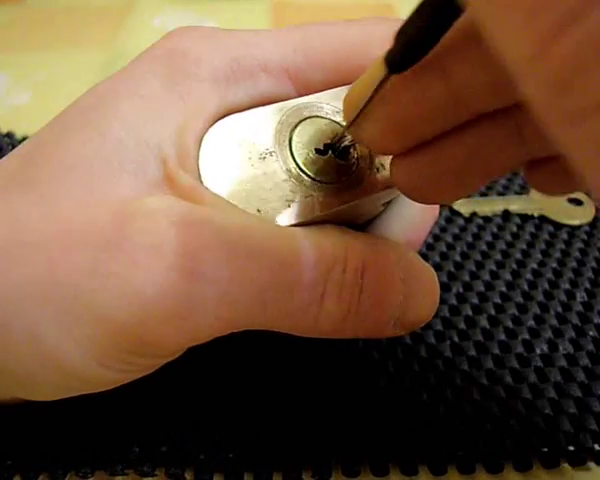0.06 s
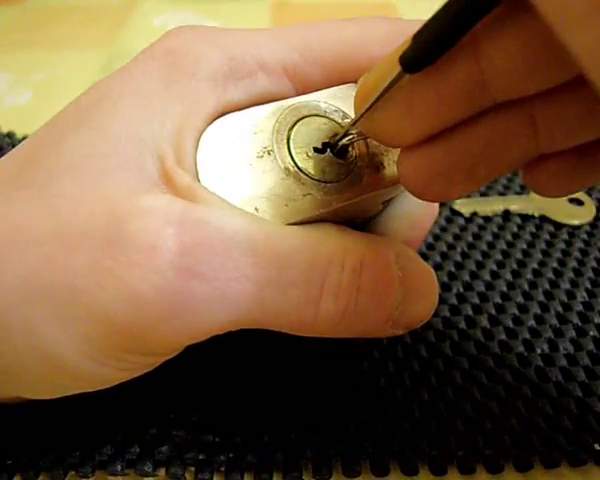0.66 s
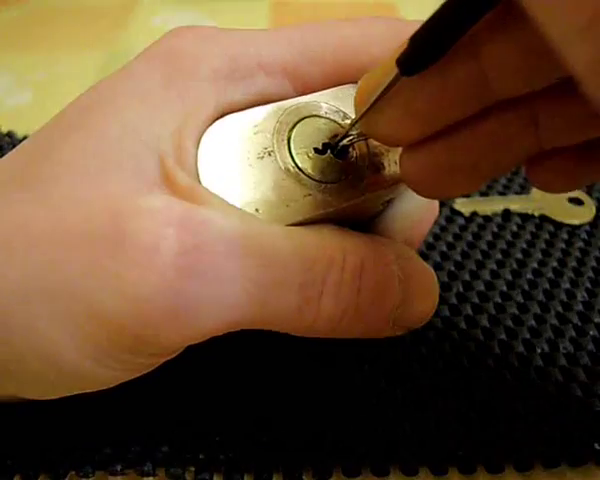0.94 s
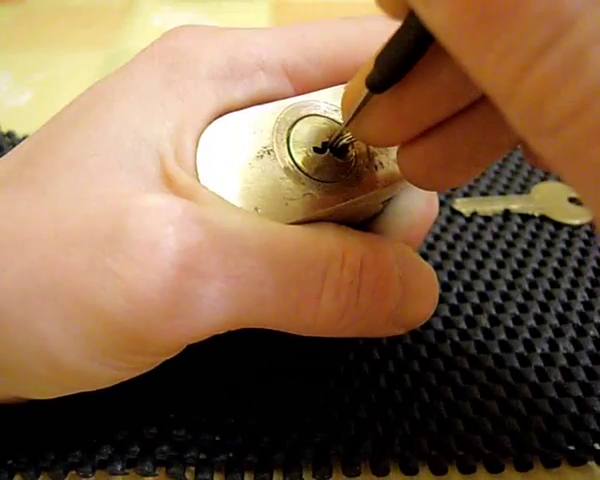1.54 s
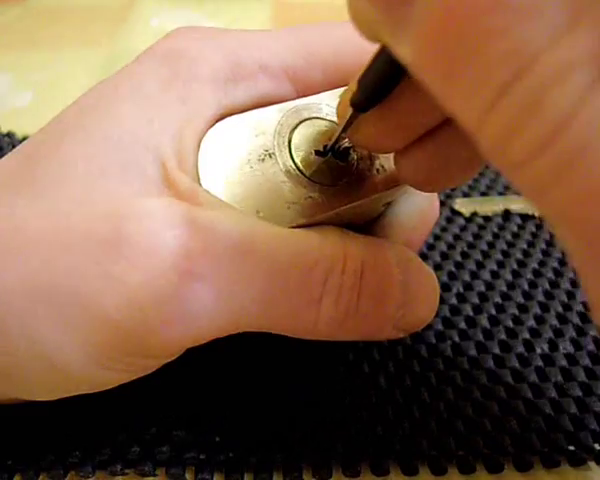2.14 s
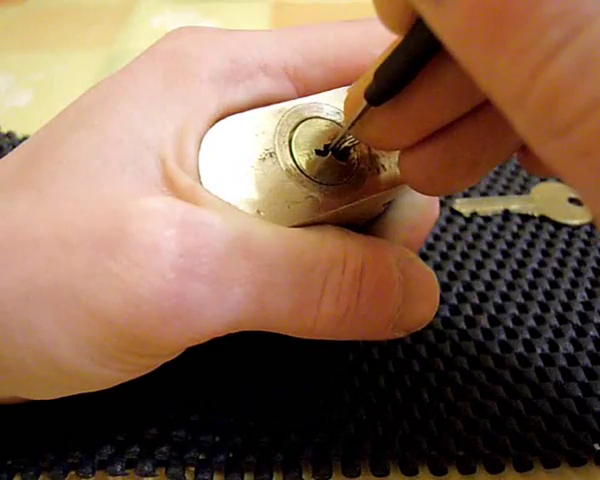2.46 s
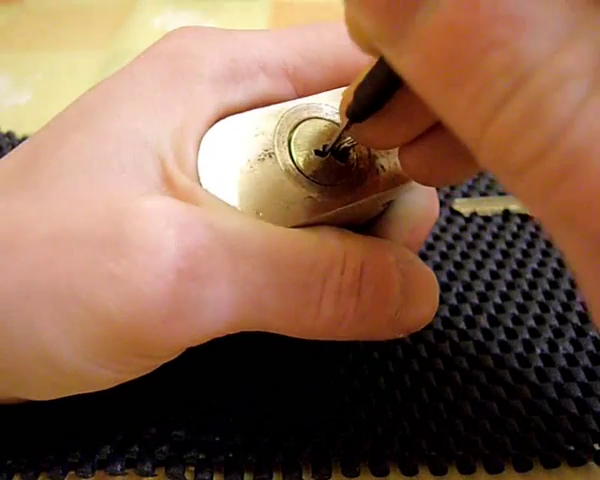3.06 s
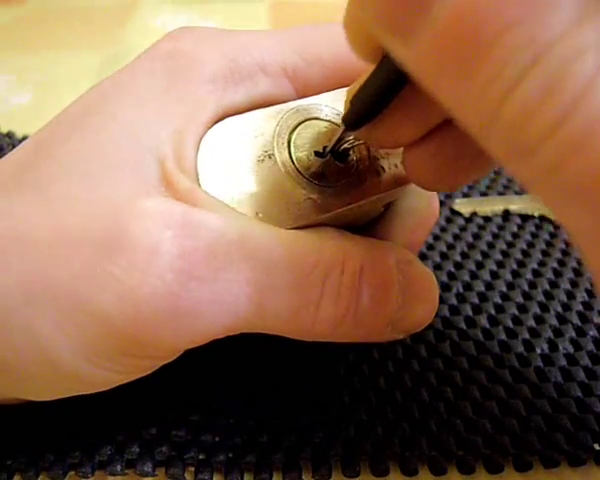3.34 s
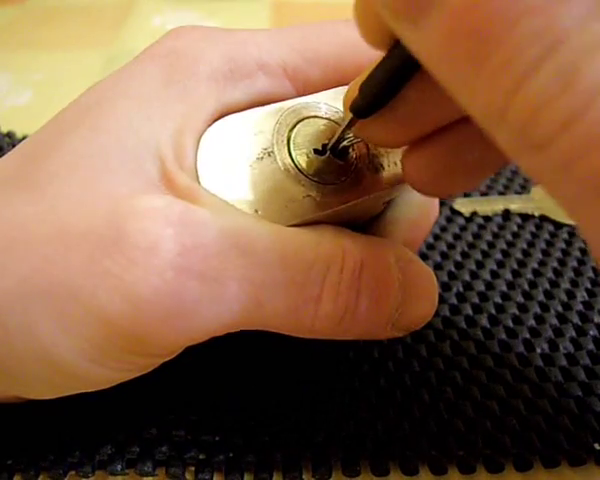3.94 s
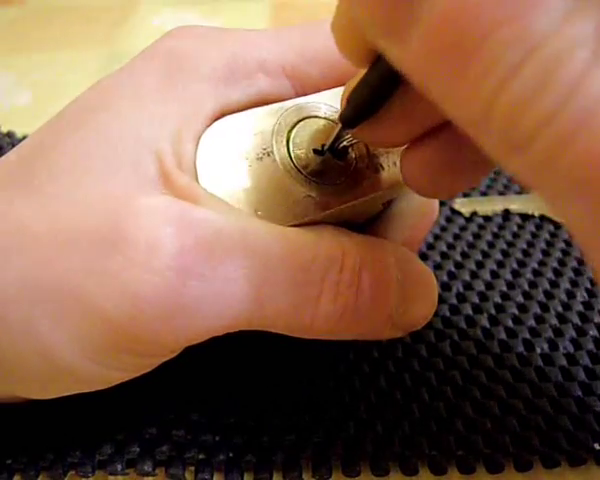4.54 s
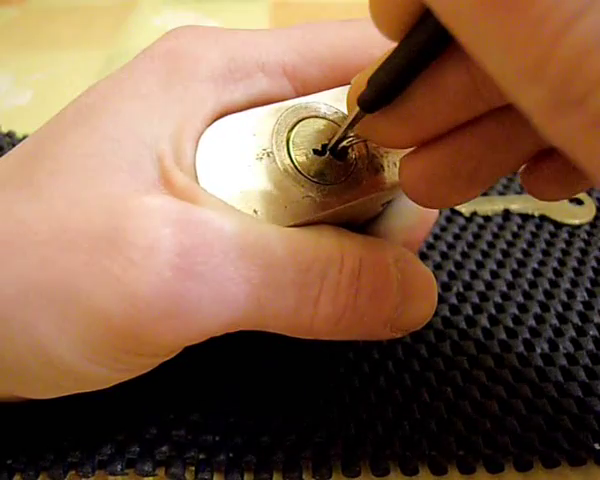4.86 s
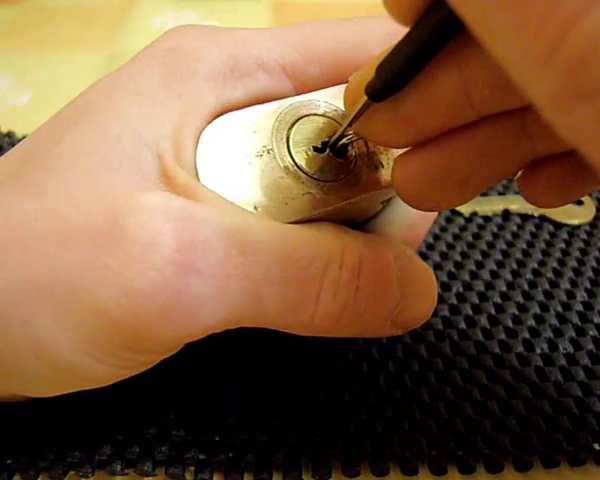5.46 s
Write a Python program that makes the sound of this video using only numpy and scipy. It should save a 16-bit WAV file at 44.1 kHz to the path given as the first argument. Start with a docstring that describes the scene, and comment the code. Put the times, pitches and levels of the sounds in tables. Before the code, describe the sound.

Tiny bright clicks of a pick working a padlock's pins, with soft knocks, over a steady fan hum and hiss.

```python
"""Picking a brass padlock

A pick and a tension tool work a padlock held in the hand, close up. Pins snap with tiny bright clicks,
the pick scrapes over burrs, and the tool stutters once through a run of dull slips. The lock body
knocks softly in the palm over a faint rumble of skin. Behind it cooling fans rush and hum,
and a small camera's electronics hiss and whine."""
import sys
import numpy as np
from scipy import signal
from scipy.fft import rfft, irfft
from scipy.io import wavfile
from scipy.ndimage import map_coordinates

SR = 44100
rng = np.random.default_rng(int(sys.argv[2]) if len(sys.argv) > 2 else 0)


def int16_out(signal):
    """Quantize to a 16-bit WAV file."""
    q = np.round(np.clip(np.atleast_2d(signal).T, -1, 1) * 32767)
    wavfile.write(sys.argv[1], SR, q.astype(np.int16))


N = 247401

# Microphone hiss. Each row: frequency in Hz, level in dB per Hz.
HISS_SPECTRUM = [(20, -107), (3200, -106.5), (3900, -104.2), (4750, -109.3), (6050, -111), (6600, -108.7),
                 (8600, -111.6), (10400, -111.3), (10800, -107.7), (11350, -108.2), (11650, -112),
                 (13500, -114.5), (15350, -114), (15800, -134)]
# Thin steady tones of the electronics. Each row: pitch in Hz, rms level in dB.
THIN_TONES = [(1067, -65.5), (1477, -78), (3200, -86), (3512, -86), (9599, -87), (12450, -89)]
# Camera whine. Each row: pitch in Hz, rms level in dB.
WHINE_TONES = [(7868, -72.7), (14182, -77.2)]
# Rush of fan air. Each row: frequency in Hz, level in dB per Hz.
AIR_SPECTRUM = [(20, -103), (420, -103), (510, -90.5), (585, -95), (725, -79.5), (870, -81), (915, -83.5),
                (1030, -91), (1290, -80.5), (1390, -91.5), (1930, -91.5), (2050, -102), (2330, -86),
                (2520, -98), (2650, -93), (3150, -108), (4200, -130)]
# Case resonances that colour the air. Each row: centre in Hz, width in Hz, peak in dB per Hz.
CASE_MODES = [(961, 46, -80), (1197, 27, -84.5), (1254, 42, -81), (3494, 74, -102)]
# The main fan sags and picks up again. Each row: time in seconds, blade pitch in Hz, level in dB.
BLADE_CURVE = [(0, 987, -54.5), (.3, 984, -55), (.55, 984, -66), (1, 984, -60.5), (1.8, 967, -56),
               (2.2, 961, -57.5), (2.7, 964, -55.5), (3.9, 959, -59.5), (4.7, 974, -54.5),
               (5.6, 986, -54.5)]
# Swells of a higher fan hum. Each row: start and length in seconds, pitch in Hz, level in dB.
HUM_SWELLS = [(0, 0.53, 1236, -54.5), (.64, .18, 1230, -54), (3.15, .58, 1280, -55),
              (4.6, .58, 1250, -55.5), (5.197, 0.42, 1230, -53)]
# Skin rubbing on the lock. Each row: frequency in Hz, relative level in dB.
SKIN_SPECTRUM = [(15, 0), (60, -2), (100, 1), (150, -8.5), (230, -7.5), (400, -9), (700, -18), (2000, -58)]
# The lock shifts in the hand. Each row: start in seconds, energy in dB, low-pass of the blow in Hz.
BODY_KNOCKS = [(0.377, -15.5, 1550), (1.0736, -33.5, 400), (1.3921, -24, 2343), (1.671, -36, 502),
               (1.807, -36, 400), (2.414, -36, 250), (3.042, -40, 160), (3.08, -38, 200),
               (3.566, -28.5, 161), (3.577, -28, 299), (4.038, -27, 600), (4.2796, -28, 180),
               (4.848, -27.5, 160), (4.8923, -26.5, 598), (5.29, -39, 200)]
# Resonances of the hand-damped body. Each row: centre in Hz, width in Hz, relative gain in dB.
BODY_RESONANCES = [(90, 29, 2), (225, 72, -0.5), (340, 110, -0.5), (795, 170, 3.5), (970, 150, 1.5),
                   (2750, 1200, -5)]
# Stick-slip of the tool in the keyway. Each row: start in seconds, energy in dB.
TOOL_SLIPS = [(3.5984, -29), (3.6623, -24.5), (3.7364, -23), (3.8106, -21), (3.8839, -24), (3.9591, -25)]
# Resonances of the slipping tool. Each row: centre in Hz, width in Hz, relative gain in dB.
TOOL_RESONANCES = [(1260, 430, -1.5), (2140, 250, 3.5), (2830, 1080, -3), (4000, 800, -1.5),
                   (5000, 740, -9.5), (9050, 5000, -20.5), (14300, 2500, -23)]
# The pick drags over pins and wards. Each row: start and length in seconds, relative level in dB.
PICK_DRAGS = [(1.081, .04, -75), (1.652, 0.027, -72), (1.895, 0.027, -72), (2.283, 0.053, -78),
              (2.412, 0.019, -68), (3.07, .027, -72), (3.566, 0.026, -59.5), (3.935, .036, -77),
              (4.556, 0.041, -71), (4.838, 0.023, -74), (4.895, .09, -77), (5.296, .02, -72)]
# Resonances of the dragged pick. Each row: centre in Hz, width in Hz, relative gain in dB.
PICK_RESONANCES = [(4000, 1800, -6.5), (5400, 1100, 2.5), (6840, 520, 6), (11000, 4000, -7)]
# The pick snaps a pin. Each row: start in seconds, energy in dB, ring in Hz, treble tilt in dB.
PIN_CLICKS = [(0.3758, -23, 3350, -2), (.5253, -23.5, 11100, 5), (1.0724, -22, 8300, -10),
              (1.0811, -17, 6680, -1.5), (1.3917, -28.5, 4650, -10), (1.6737, -35, 7200, -3),
              (1.8064, -22, 6670, -2), (1.899, -31.5, 6040, -1), (1.9153, -36, 6840, 2),
              (2.2592, -33, 4730, 2.5), (2.3094, -36.5, 6450, -1), (2.4093, -21, 6650, -0.5),
              (2.4183, -37, 6700, -9), (3.0788, -29.5, 5100, -2), (3.5627, -35, 5660, -1),
              (3.573, -23.5, 7600, -2), (3.5818, -34, 7700, -11), (3.9485, -29, 6500, 3),
              (4.008, -28.5, 3380, -11), (4.0377, -35.5, 7000, -7), (4.2797, -24.5, 7460, -14),
              (4.4512, -36.5, 7000, -2), (4.563, -42, 6600, -4), (4.8919, -27, 6850, 1),
              (4.894, -15.5, 6900, -2.5), (5.2903, -23.5, 6100, 2)]
# Resonances of the struck pins. Each row: centre in Hz, width in Hz, relative gain in dB.
PIN_RESONANCES = [(2540, 1050, -3), (4110, 1100, -3.5), (6000, 1800, -6.5), (7420, 1400, 2),
                  (9650, 1800, 0), (12150, 2600, 0), (14200, 2300, 1)]


def from_db(db):
    return 10 ** (np.asarray(db) / 20)


def unit_rms(x):
    return x / np.sqrt(np.mean(x ** 2) + 1e-20)


def unit_energy(x):
    return x / np.sqrt(np.sum(x ** 2) + 1e-20)


def automation(rows):
    """A lane for each column after the time, ramping from row to row."""
    times, *columns = np.transpose(rows)
    return [np.interp(np.arange(N) / SR, times, column) for column in columns]


def drift(rate_hz):
    """A smooth random wobble of rms 1 that changes about rate_hz times a second."""
    steps = rng.standard_normal(4096)
    return unit_rms(map_coordinates(steps, [np.arange(N) / SR * rate_hz], order=3, mode="wrap"))


def noise(spectrum):
    """A steady noise bed with the given level per Hz."""
    hz, db = np.transpose(spectrum)
    bins_hz = np.maximum(np.fft.rfftfreq(N, 1 / SR), 1)
    gain = from_db(np.interp(np.log(bins_hz), np.log(hz), db))
    return irfft(rfft(rng.standard_normal(N)) * gain, N) * np.sqrt(SR / 2)


def tone(hz, db):
    """A sine with the given pitch and rms level."""
    cycles = np.cumsum(hz * np.ones(N)) / SR + rng.random()
    return np.sqrt(2) * from_db(db) * np.sin(2 * np.pi * cycles)


def resonate(x, hz, width_hz):
    """One resonance with unity gain at its peak."""
    radius = np.exp(-np.pi * width_hz / SR)
    feedforward = np.array([1, 0, -1]) * (1 - radius * radius) / 2
    feedback = [1, -2 * radius * np.cos(2 * np.pi * hz / SR), radius * radius]
    return signal.lfilter(feedforward, feedback, x + 1e-18)


def lowpass(x, hz, order=2):
    return signal.sosfilt(signal.butter(order, hz, fs=SR, output="sos"), x)


def contact(grit_db, t60_s):
    """A sharp spike, then the dying chatter of two surfaces."""
    t = np.arange(SR // 8) / SR
    chatter = rng.standard_normal(len(t)) * from_db(-60 * t / t60_s)
    force = from_db(grit_db) * unit_energy(chatter)
    force[0] += 1
    return force


def strike(force, modes):
    """A force rings the modes in alternating polarity, each at a slightly random strength."""
    scatter_db = 1.2 * rng.standard_normal(len(modes))
    return sum((-1) ** k * from_db(db + scatter_db[k]) * resonate(force, hz, width_hz)
               for k, (hz, width_hz, db) in enumerate(modes))


def place(track, start_s, sound):
    """Mix a sound into the track at start_s."""
    first = int(np.clip(round(start_s * SR), 0, N - 1))
    track[first:first + len(sound)] += sound[:N - first]


def room_tail(x):
    """The faint short tail of a small furnished room."""
    t60_s, predelay_s = 0.075, 0.003
    t = np.arange(SR // 2) / SR
    tail = rng.standard_normal(len(t)) * from_db(-60 * t / t60_s) * (t > predelay_s)
    return signal.fftconvolve(x, from_db(-15) * unit_energy(tail))[:N]


def electronics():
    """Hiss, thin tones and a camera whine that buzzes as its polarity flips with every frame."""
    frame_rate_hz = 30
    polarity = np.tanh(8 * np.sin(np.pi * frame_rate_hz * np.arange(N) / SR))
    whine = polarity * sum(tone(hz, db) for hz, db in WHINE_TONES)
    return noise(HISS_SPECTRUM) + sum(tone(hz, db) for hz, db in THIN_TONES) + whine


def fan_hum():
    """A higher fan hum fades in, holds and fades out now and then over a steady motor tone."""
    motor_hz, motor_db, fade_s = 1231, -63.5, 0.15
    t = np.arange(N) / SR
    waver_hz, waver_db = 1.41 * drift(12), 0.5 * drift(8.6)
    hum = tone(motor_hz, motor_db + waver_db)
    for start, length, hz, db in HUM_SWELLS:
        swell = np.clip(0.5 + np.minimum(t - start, start + length - t) / fade_s, 0, 1)
        hum += swell * tone(hz + waver_hz, db + waver_db)
    return hum


def fans():
    """Rushing air coloured by the case, with a wavering blade tone, its octave and the hum."""
    air = noise(AIR_SPECTRUM)
    for hz, width_hz, db in CASE_MODES:
        air += resonate(noise([(20, db), (20000, db)]), hz, width_hz)
    blade_hz, blade_db = automation(BLADE_CURVE)
    blade_hz += 1.53 * drift(8)
    blades = tone(blade_hz, blade_db + 1.3 * drift(14))
    octave = tone(2 * blade_hz, db=-73 + 2 * drift(5.93))
    return air * from_db(0.28 * drift(7)) + blades + octave + fan_hum()


def grip_rumble():
    """Skin rumbles on the lock, swelling as the hand tightens before a knock and easing after it."""
    rest_db, wander_db, flutter_db = -77.5, 2, 2.5
    swell_re_knock_db, rise_s, fall_s = -37.5, 0.029, 0.031
    t = np.arange(N) / SR
    power = from_db(rest_db + wander_db * drift(3.1)) ** 2
    for start, db, _ in BODY_KNOCKS:
        swell = np.exp(-np.maximum((start - t) / rise_s, (t - start) / fall_s))
        power += (from_db(db + swell_re_knock_db) * swell) ** 2
    flutter = from_db(flutter_db * drift(25))
    return np.sqrt(power) * flutter * unit_rms(noise(SKIN_SPECTRUM))


def palm_knocks():
    """The lock body thuds in the palm; the hardest blows crack, and the flesh settles after each."""
    track = np.zeros(N)
    for start, db, hardness_hz in BODY_KNOCKS:
        blow = lowpass(contact(grit_db=-7, t60_s=0.0084), hardness_hz)
        settling = from_db(-19.5) * lowpass(contact(grit_db=12, t60_s=0.06), hz=280)
        knock = strike(blow + settling, BODY_RESONANCES)
        place(track, start, from_db(db) * unit_energy(knock))
    return track


def tool_slips():
    """The tension tool sticks and lets go in a dull stutter, about thirteen times a second."""
    track = np.zeros(N)
    for start, db in TOOL_SLIPS:
        slip = strike(contact(grit_db=-7, t60_s=0.012), TOOL_RESONANCES)
        place(track, start, from_db(db) * unit_energy(slip))
    return track


def pick_scrapes():
    """The dragged pick catches on tiny burrs: dense, uneven ticks that die away."""
    burrs_per_s, makeup_db = 800, 9
    force = np.zeros(N)
    for start, length, db in PICK_DRAGS:
        samples = int(length * SR)
        strength = rng.standard_normal(samples) * from_db(4 * rng.exponential(1, samples))
        catches = rng.random(samples) < burrs_per_s / SR
        fade = np.linspace(1, 0.3, samples)
        place(force, start, from_db(db) * unit_rms(strength * catches * fade))
    return from_db(makeup_db) * strike(force, PICK_RESONANCES)


def pin_click(ring_hz, tilt_db):
    """One snap: the pins sound, the touched part rings briefly and the steel shaft sings on."""
    force = contact(grit_db=-1.5, t60_s=0.009)
    ring = from_db(-2.5) * unit_energy(resonate(force, ring_hz, width_hz=520))
    shaft = from_db(-21) * unit_energy(resonate(force, hz=5670, width_hz=34))
    click = unit_energy(strike(force, PIN_RESONANCES)) + ring + shaft
    lows = lowpass(click, hz=8000, order=1)
    treble = click - lows
    return unit_energy(lows + from_db(tilt_db) * treble)


def pins():
    """The pick snaps the pins in distinct clicks and brushes them faintly around each drag."""
    touches_per_drag, touch_db, touch_hz = 2, -41, 6300
    spread_s, spread_db, spread_octaves = 0.04, 0.5, 0.2
    track = np.zeros(N)
    for start, db, ring_hz, tilt_db in PIN_CLICKS:
        place(track, start, from_db(db) * pin_click(ring_hz, tilt_db))
    for start, length, _ in PICK_DRAGS:
        for timing, softness, pitch in rng.standard_normal((touches_per_drag, 3)):
            touch = pin_click(touch_hz * 2 ** (spread_octaves * pitch), tilt_db=-1)
            gain = from_db(touch_db - spread_db * softness)
            place(track, start + length / 2 + spread_s * timing, gain * touch)
    return track


def scene():
    """A mono mix: lock and hand up front with a touch of room, fans and electronics behind."""
    lock = pins() + pick_scrapes() + tool_slips() + palm_knocks() + grip_rumble()
    return (lock + room_tail(lock) + fans() + electronics())[None]


def record(dry):
    """A steep low-pass shaves off the very top."""
    cutoff_hz = 16100
    return signal.sosfilt(signal.ellip(10, 0.2, 70, cutoff_hz, fs=SR, output="sos"), dry)


dry = scene()
out = record(dry)
int16_out(out)
```